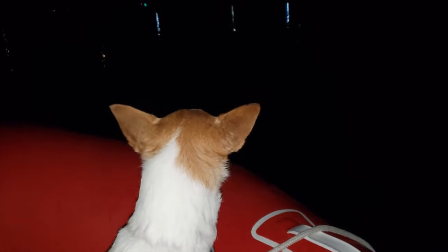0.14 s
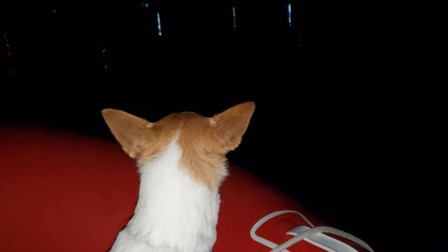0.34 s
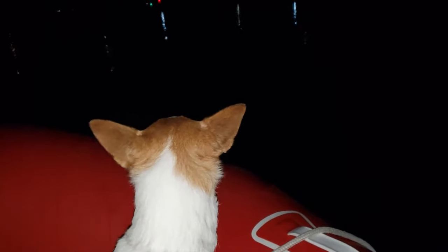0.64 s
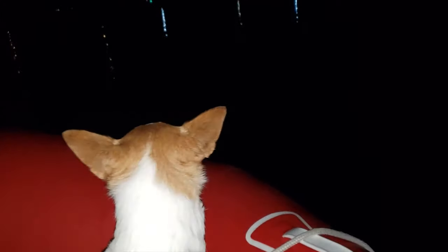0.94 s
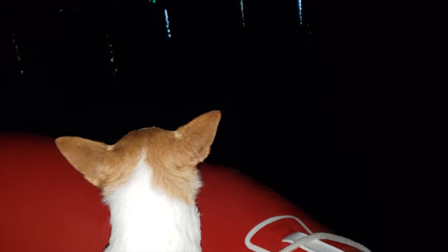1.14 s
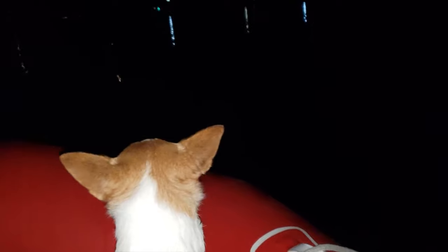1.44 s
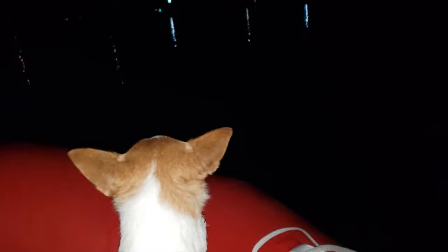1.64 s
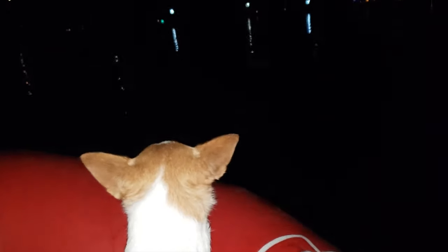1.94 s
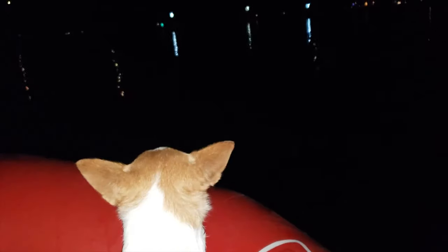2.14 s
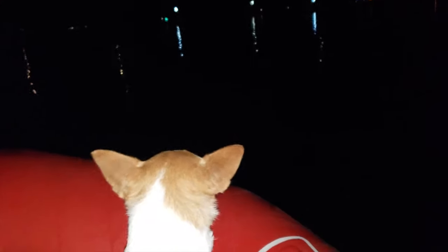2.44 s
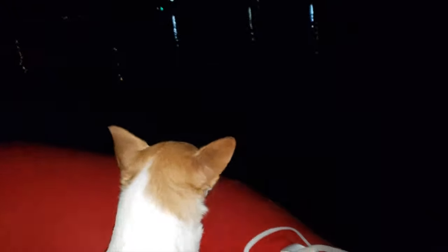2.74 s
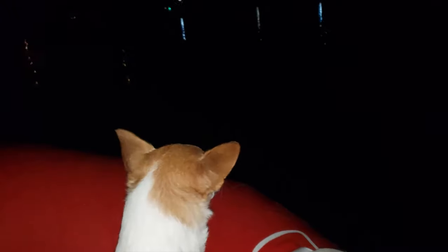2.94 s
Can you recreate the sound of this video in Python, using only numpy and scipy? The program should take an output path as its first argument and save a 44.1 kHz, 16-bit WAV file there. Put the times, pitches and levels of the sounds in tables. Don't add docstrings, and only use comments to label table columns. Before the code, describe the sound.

Small single-cylinder boat motor putters steadily close by, bubbling low, with faint water wash.

```python
import sys
import numpy as np
from scipy import signal
from scipy.fft import rfft, irfft, next_fast_len
from scipy.io import wavfile
from scipy.ndimage import uniform_filter1d, map_coordinates

SR = 44100
rng = np.random.default_rng(int(sys.argv[2]) if len(sys.argv) > 2 else 0)


def to_wav(s):
    ch = np.atleast_2d(s).T
    pcm = np.round(np.clip(ch, -1, 1) * 32767)
    wavfile.write(sys.argv[1], SR, pcm.astype(np.int16))


def gain_from_decibels(decibels):
    exponent = np.asarray(decibels, float) / 20
    return 10 ** exponent


N = 136710
T_S = np.arange(N) / SR
MAX_CYCLES = 70


def unit(x):
    return x / np.sqrt(np.mean(x ** 2) + 1e-20)


def along(points, hz):
    f, v = np.transpose(points)
    return np.interp(np.log(hz + 1), np.log(f + 1), v)


def wobble(rate_hz):
    knots = rng.standard_normal(int(N * rate_hz / SR) + 4)
    return map_coordinates(knots, [np.arange(N) * rate_hz / SR])


def filtered(x, response):
    m = next_fast_len(N + SR // 2)
    return irfft(rfft(x, m) * response(np.fft.rfftfreq(m, 1 / SR)), m)[..., :N]


def peak(f, hz, width_hz):
    return 1j * f * width_hz / (hz * hz - f * f + 1j * f * width_hz)


def noise(spectrum, patchy_db):
    z = signal.stft(rng.standard_normal(N), nperseg=512)[2]
    field = uniform_filter1d(rng.standard_normal(z.shape), size=6, axis=0)
    field = uniform_filter1d(field, size=12, axis=1)
    x = signal.istft(z * gain_from_decibels(patchy_db * unit(field)), nperseg=512)[1][:N]
    return unit(filtered(x, lambda f: gain_from_decibels(along(spectrum, f))))


# t/s, firing rate/Hz, bark level/dB (unused)
SPEED = [(0.0, 21.467, -27.6), (0.24, 21.47, -26.9), (0.48, 21.491, -26.9), (0.72, 21.519, -27.6),
         (0.95, 21.581, -27.1), (1.19, 21.661, -27.5), (1.43, 21.681, -31.7), (1.67, 21.566, -30.4),
         (1.91, 21.346, -27.8), (2.15, 21.179, -28.2), (2.38, 21.19, -29.0), (2.62, 21.287, -28.3),
         (2.86, 21.346, -27.3), (3.1, 21.351, -29.7)]


def cycles():
    start_cycles = -.086
    t_s, rate_hz, _ = np.transpose(SPEED)
    return start_cycles + np.cumsum(np.interp(T_S, t_s, rate_hz)) / SR


def moments(share):
    return np.interp(np.arange(MAX_CYCLES) + share, cycles(), T_S, left=-1, right=-1)


def pulses(share, scatter_db, jitter_s):
    s = moments(share)
    z = rng.standard_normal((MAX_CYCLES, 2))
    at = np.clip(np.round((s + jitter_s * z[:, 0]) * SR).astype(int), 0, N - 1)
    return np.bincount(at, gain_from_decibels(scatter_db * z[:, 1]) * (s >= 0), N)


# t/s, level/dB, f/Hz
BARK = [(0.0, -20.5, 190), (0.02, -33.5, 209.4), (0.11, -27, 195.5), (0.62, -28, 190.6), (0.67, -33.5, 196),
        (0.76, -23.5, 202), (0.78, -29, 210), (0.94, -25.5, 210), (1.02, -34.5, 201), (1.14, -23.5, 211),
        (1.28, -33, 204.4), (1.72, -31.5, 209), (1.85, -32.5, 203), (1.86, -27.5, 205), (2.37, -30, 203),
        (2.85, -27, 213), (3.06, -32.5, 211), (3.1, -30, 214)]


def bark():
    share, gain_db, scatter_db = 0.0867, 0.62, 0.76
    rise_s, fall_s, late_s, jitter_s = 0.0073, 0.011, 0.00087, 0.0018
    detune, memory = 0.031, 0.94
    t_s, level_db, pitch_hz = np.transpose(BARK)
    s = moments(share)
    z = rng.standard_normal((MAX_CYCLES, 3))
    u_s = np.arange(-2000, 2000)[None] / SR

    drift = z[:, :1] + memory * np.roll(z[:, :1], 1)
    hz = np.interp(s, t_s, pitch_hz)[:, None] * (1 + detune * drift)
    wave = np.cos(2 * np.pi * hz * u_s)

    v_s = u_s - late_s - jitter_s * z[:, 1:2]
    swell = np.exp(-.5 * (v_s / np.where(v_s < 0, rise_s, fall_s)) ** 2)
    swell = swell * gain_from_decibels(scatter_db * z[:, 2:]) * (s >= 0)[:, None]

    pad = 2 * SR
    at = np.round((s[:, None] + u_s) * SR).astype(int) + pad
    x = np.bincount(at.ravel(), (wave * swell).ravel(), N + 3 * SR)[pad:][:N]
    return unit(x) * gain_from_decibels(np.interp(T_S, t_s, level_db) + gain_db)


def gulp():
    hz, width_hz, fall_s_per_hz = 121.4, 20.8, 0.00061

    def fall(f):
        off_hz = f - hz
        return np.exp(-.5 * (off_hz / width_hz) ** 2 + 1j * np.pi * fall_s_per_hz * off_hz ** 2)

    clicks = pulses(share=.263, scatter_db=1, jitter_s=.0003)
    return gain_from_decibels(-27) * unit(filtered(clicks, fall))


# share of cycle, f/Hz, width/Hz, level/dB rms, scatter/dB
THUMPS = [
    (-.04, 56, 28, -32, .3),
    (-.065, 86, 16, -39, .8),
]


def thump():
    out = 0
    for share, hz, width_hz, db, scatter_db in THUMPS:
        clicks = pulses(share, scatter_db, 0)
        out = out + gain_from_decibels(db) * unit(filtered(clicks, lambda f: peak(f, hz, width_hz) ** 2))
    return out


# multiple of firing rate, level/dB rms
GEARS = [(14, -55.5), (16, -62.5), (18, -51), (20, -56), (26, -51), (36, -63), (39, -61), (49, -65.5),
         (98, -65.5)]


def gears():
    swing_db, wander_rad = 1.5, .7
    c = cycles()
    out = 0
    for k, db in GEARS:
        level = np.sqrt(2) * gain_from_decibels(db + swing_db * wobble(5.925))
        out = out + level * np.sin(2 * np.pi * k * c + wander_rad * wobble(5))
    return out


# f/Hz, width/Hz, level/dB
COWL = [(740, 90, -6), (1062, 43, 7.5), (1557, 37, 3), (2257, 20, -1), (2883, 320, -10), (3730, 230, -16.5)]
# share of cycle, level/dB
TICKS = [(.2, -57.5), (0.3, -53.5), (0.9, -54.5), (0.55, -63)]


def ticks():
    def cowl(f):
        return sum((-1) ** k * gain_from_decibels(db) * peak(f, hz, w) for k, (hz, w, db) in enumerate(COWL))

    out = 0
    for share, db in TICKS:
        clicks = pulses(share, scatter_db=2.2, jitter_s=.0008)
        out = out + gain_from_decibels(db) * unit(filtered(clicks, cowl))
    return out


# t/s, level/dB
LOOSENESS = [(0.0, -60), (0.01, -63), (0.11, -63), (1.76, -61), (2.09, -64.5), (3.02, -60.5), (3.04, -66.5),
             (3.05, -60)]


def gated(share, sharp, spectrum, db):
    c = cycles() - share
    size = gain_from_decibels(1.6 * rng.standard_normal(MAX_CYCLES + 2))[np.round(c).astype(int) + 1]
    gate = np.exp(sharp * (np.cos(2 * np.pi * c) - 1)) * size * gain_from_decibels(1.8 * wobble(300))
    t_s, loose_db = np.transpose(LOOSENESS)
    swing_db = np.interp(T_S, t_s, loose_db - loose_db.mean())
    return gain_from_decibels(db + swing_db) * unit(gate * noise(spectrum, patchy_db=-3.0))


# f/Hz, level/dB per Hz
PUFF = [(2000, -5), (3000, 6), (5000, 3.5), (7800, -2.5), (9000, -16.5), (12000, -6.5), (15500, -30)]


def puff():
    return gated(share=0.35, sharp=0.73, spectrum=PUFF, db=-59.5)


# f/Hz, level/dB per Hz
RATTLE = [(3000, -18), (5000, -3), (6500, -6.5), (7800, 1.5), (8300, -6.5), (12000, -8), (15600, -10)]


def rattle():
    return gated(share=0.39, sharp=6.3, spectrum=RATTLE, db=-67)


# t/s, f/Hz, level/dB
SPLASHES = [
    (.58, 11500, -61),
    (1.785, 2390, -45.5),
    (1.81, 2760, -53),
    (2.67, 2570, -55),
    (2.821, 2420, -48),
]


def splashes():
    length_s, q = .007, 9
    out = 0
    for s, hz, db in SPLASHES:
        burst = np.exp(-.5 * ((T_S - s) / length_s) ** 2)
        fizz = filtered(rng.standard_normal(N), lambda f: peak(f, hz, hz / q) ** 2)
        out = out + gain_from_decibels(db) * burst * unit(fizz)
    return out


# f/Hz, level/dB per Hz
WASH = [(160, -9), (270, -5.5), (332, -3.5), (555, -7), (643, -13), (1050, -17), (1200, -16.5), (1590, -18),
        (5000, -30.5), (6500, -41), (11000, -120)]


def wash():
    beat_db = 0.5 * np.cos(2 * np.pi * (cycles() - .2)) + .2 * wobble(3) + 1.1 * wobble(90)
    return gain_from_decibels(-41.5 + beat_db) * noise(WASH, patchy_db=1.2)


# f/Hz, level/dB per Hz
RUMBLE = [(15, -19), (45, -10), (110, -3.5), (200, 0.5), (260, 2), (330, -40.5)]


def rumble():
    return gain_from_decibels(-40) * noise(RUMBLE, patchy_db=-0.3)


# f/Hz, level/dB per Hz
HISS = [(2060, 64), (3500, 4), (6060, -46), (7720, 60.5), (8530, -46), (11500, -12), (15500, -20.5)]


def spray():
    drops_per_s, spread_db = 200, 3.5
    size = gain_from_decibels(spread_db * rng.exponential(size=N).clip(0, 4))
    hits = (rng.random(N) < drops_per_s / SR) * size
    drops = filtered(hits, lambda f: peak(f, 9000, 7000) * peak(f, 13400, 6000))
    hiss = gain_from_decibels(-65.5 + .6 * wobble(2.5)) * noise(HISS, patchy_db=1.5)
    return hiss + gain_from_decibels(-80) * unit(drops)


def diffuse():
    return ticks() + puff() + rattle() + wash() + rumble() + spray()


# f/Hz, correlation
ALIKE = [(60, .99), (200, .985), (330, .65), (800, .65), (1500, .65), (3000, .5), (6000, .3), (15000, .15)]


def spread(steady):
    def angle(f):
        return np.arccos(np.clip(along(ALIKE, f), 0, 1)) / 2

    shared = filtered(diffuse(), lambda f: np.cos(angle(f)))
    opposed = filtered(diffuse(), lambda f: np.sin(angle(f)))
    return np.array([steady + shared + opposed, steady + shared - opposed])


# f/Hz, level/dB
LEFT = [(60, 2.5), (200, 7), (700, 9), (1300, 10.5), (3000, 4.5), (5000, 9.5), (9000, 9), (15000, 6.5)]
# f/Hz, phase/rad
LEAD = [(40, 0.1), (86, .5), (125, 0.34), (215, 0.26), (400, 0.0), (600, 0.1), (1120, -2.5), (2300, -1.5),
        (3500, -1.5)]


def place_left(pair):
    side = np.array([[.5], [-.5]])

    def response(f):
        left_db = along(LEFT, f)
        share = 2 / (gain_from_decibels(left_db / 2) + gain_from_decibels(-left_db / 2))
        return share * gain_from_decibels(side * left_db) * np.exp(1j * side * along(LEAD, f))

    return filtered(pair, response)


def scene():
    return place_left(spread(bark() + gulp() + thump() + gears() + splashes()))


def low_pass(x):
    return signal.sosfilt(signal.butter(12, 15670, fs=SR, output="sos"), x)


# f/Hz, level/dB
DEAF = [(5500, -1), (5700, -72), (6150, -32), (6300, -50), (7300, -104), (8500, -51), (8750, -57),
        (9000, 3.5)]


def record(dry):
    low_cut_hz, leak_db = 40, -37

    def ports(f):
        low_cut = 1 / np.sqrt(1 + (low_cut_hz / (f + 1)) ** 16) + gain_from_decibels(leak_db)
        return np.array([np.ones_like(f), gain_from_decibels(along(DEAF, f))]) * low_cut

    return low_pass(filtered(dry, ports))


dry = scene()
out = record(dry)
to_wav(out)
```